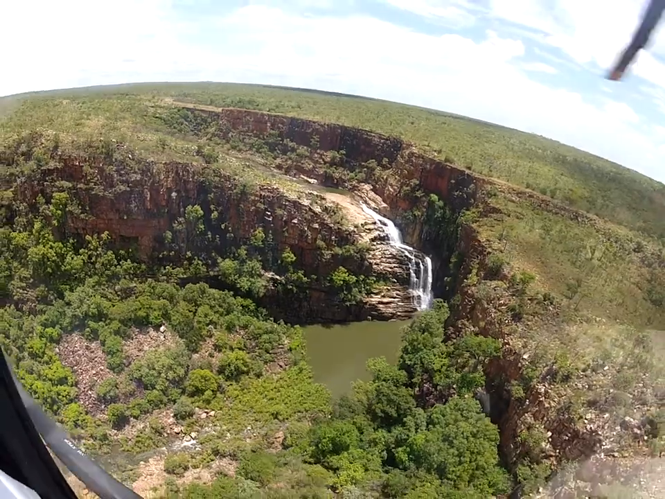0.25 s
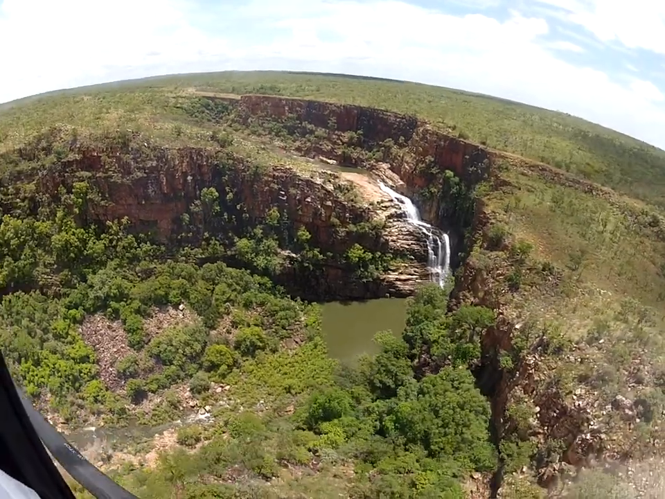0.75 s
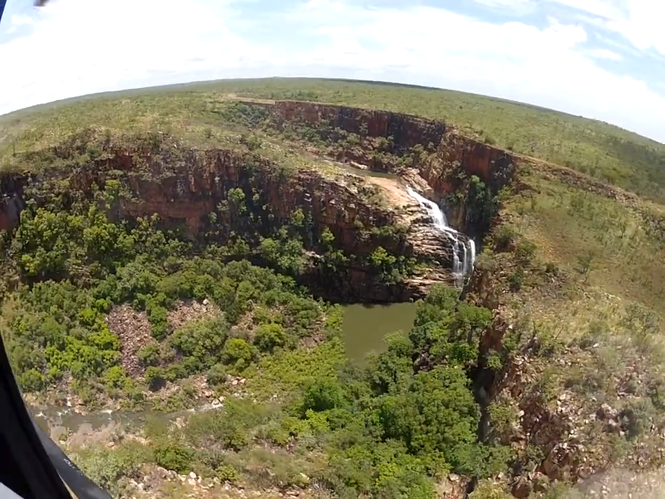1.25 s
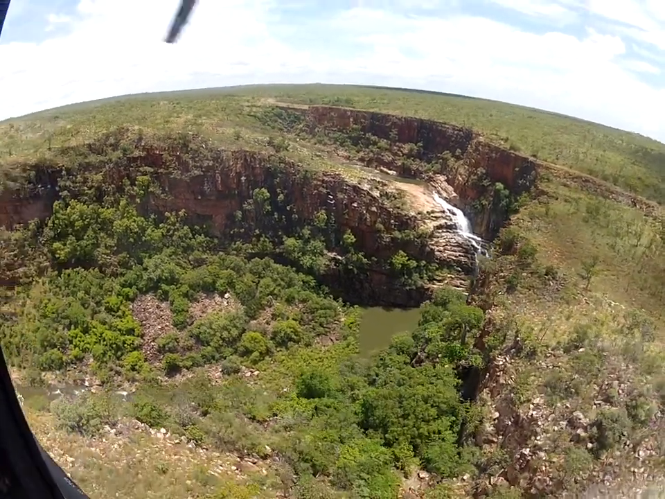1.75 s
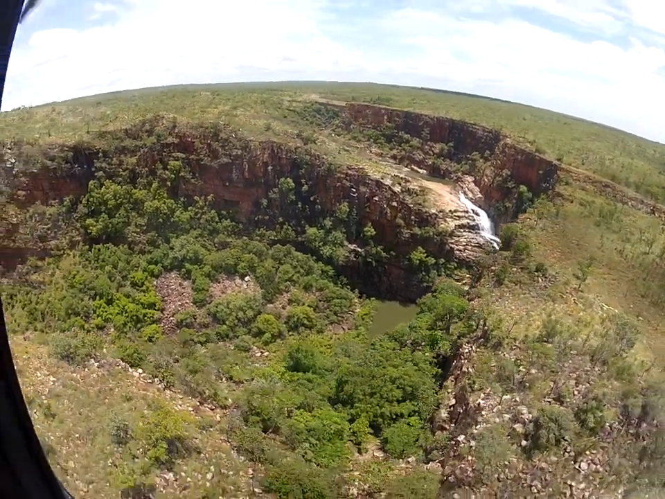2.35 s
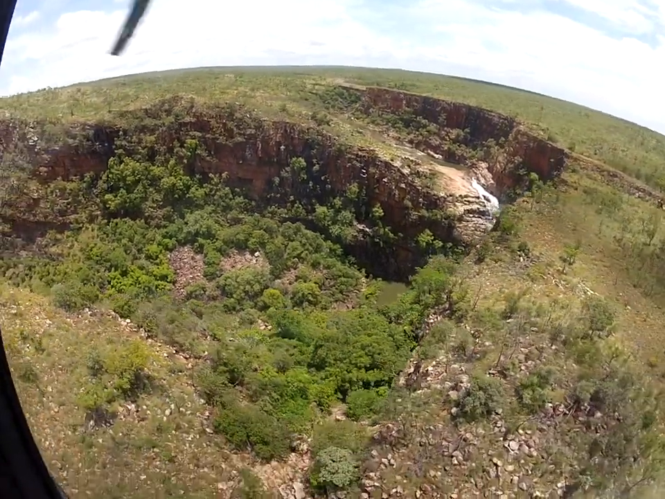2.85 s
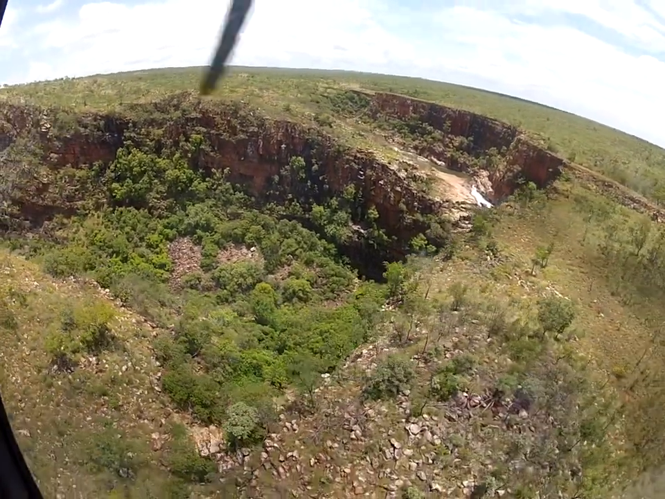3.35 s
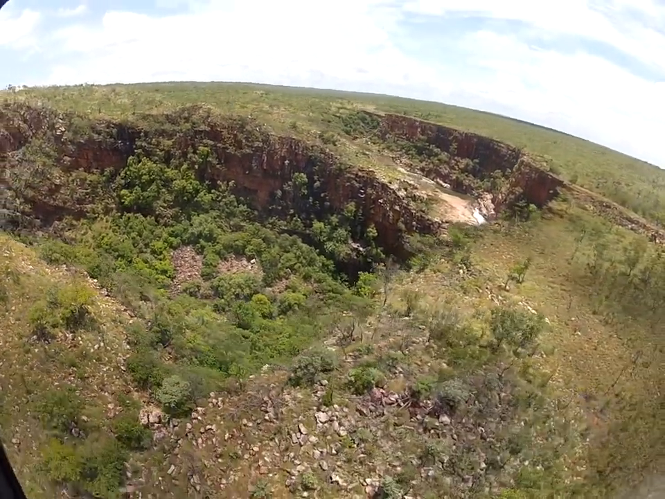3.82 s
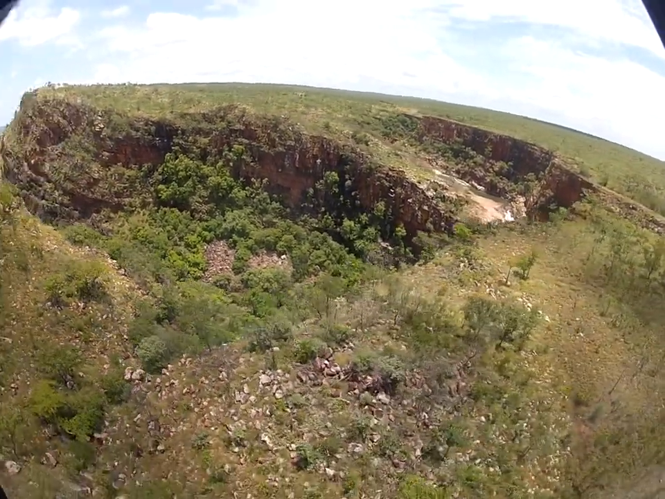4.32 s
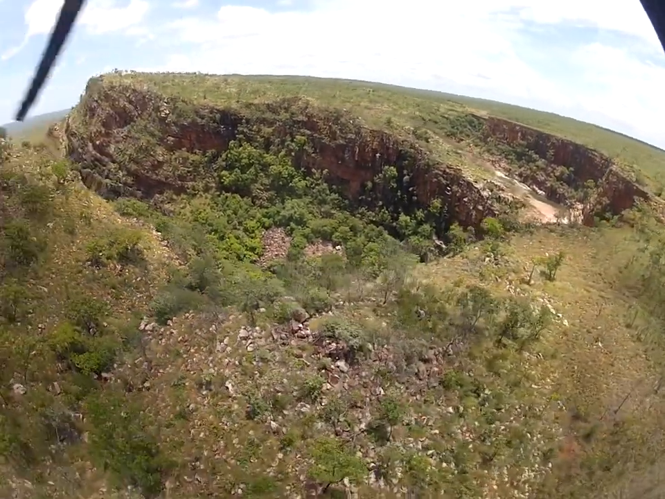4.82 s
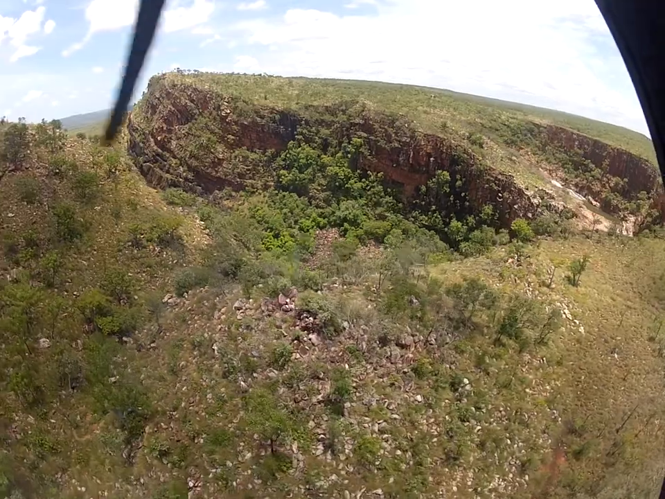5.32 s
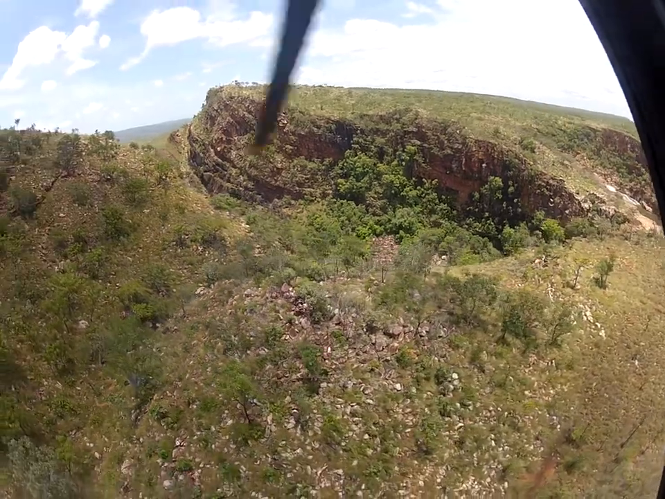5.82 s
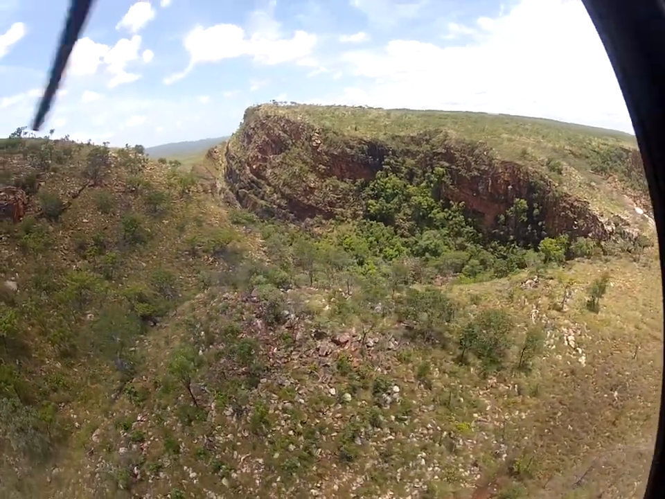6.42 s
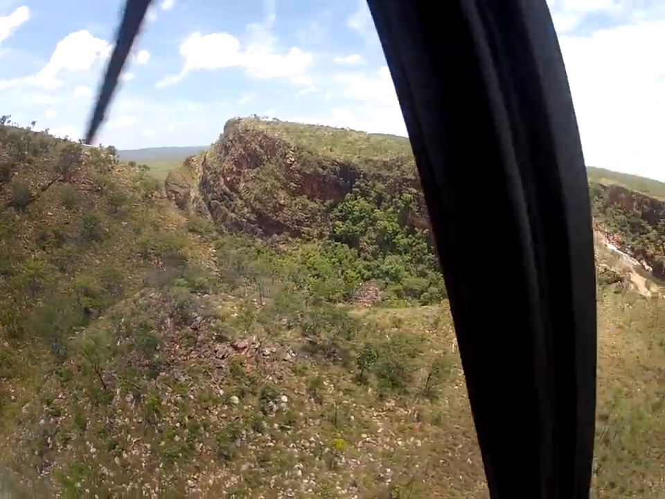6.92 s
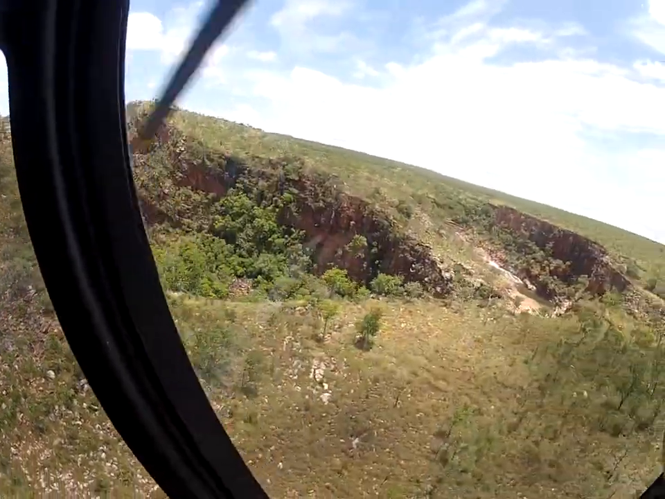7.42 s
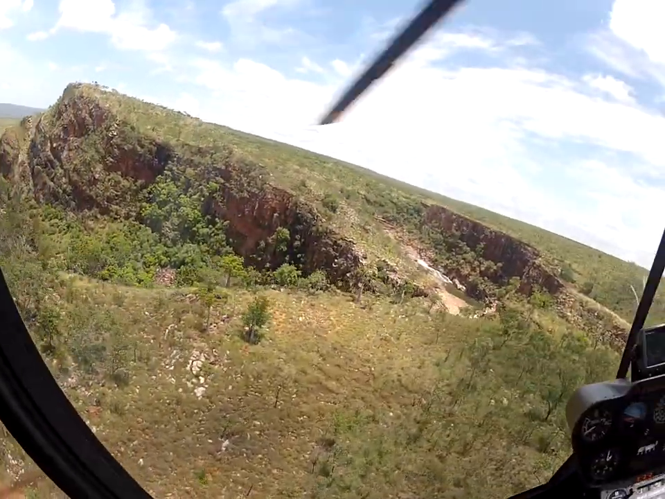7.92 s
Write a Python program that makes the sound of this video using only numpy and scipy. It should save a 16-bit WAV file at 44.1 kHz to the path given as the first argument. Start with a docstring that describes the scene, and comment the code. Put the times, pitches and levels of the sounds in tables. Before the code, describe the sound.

Inside a small helicopter cabin, a loud steady piston engine drone throbs with rotor beats, bursts of blade slap, and one sharp knock near the end.

```python
"""Cabin of a light piston helicopter in a banking turn, close to 8.2 s.
From the start: six-cylinder firing tone and harmonics, repeated rattle pattern, geared whines, blade pulses at a tenth
of the firing rate, shaped-noise wash and rush. Slaps (noise bursts, cracks, pushes) come in spells from 0.25 s to 3.5 s;
a gust swells the draught at 3.7 s, a panel sings most near 5.3 s, slaps return from 5.7 s to 6.9 s. Light rubs hiss
from 6 s; one knock rings the microphone housing at 7.7 s. Coarse sampling mirrors the sound into the treble."""
import sys
import numpy as np
from scipy import signal
from scipy.fft import rfft, irfft, next_fast_len
from scipy.io import wavfile
from scipy.ndimage import uniform_filter1d, map_coordinates

SR = 44100
rng = np.random.default_rng(int(sys.argv[2]) if len(sys.argv) > 2 else 0)


def master(y):
    """Save y as 16-bit WAV."""
    cut = np.clip(np.atleast_2d(y).T, -1, 1)
    pcm = np.round(cut * 32767)  # scale
    wavfile.write(sys.argv[1], SR, pcm.astype(np.int16))


N = 360297
FIRINGS_PER_BLADE, FIRINGS_PER_CYCLE = 10, 6

# rotor load through the turn: [t/s, blade pulse level/dB before trim, wash level/dB before stirring]
ROTOR_LOAD = [(0, -48, -33), (2, -41.5, -32.5), (2.7, -46.5, -33), (5.0, -45.5, -35), (6.1, -37, -32.5),
              (7.0, -38.5, -34.5), (7.6, -38.5, -39)]


def amp(db):
    """Decibels to gain."""
    return 10 ** (np.asarray(db) / 20)


def unit(x):
    """Scale to rms 1."""
    return x / np.sqrt(np.mean(x ** 2) + 1e-20)


def gain(points, hz):
    """Gain of (f/Hz, level/dB) points joined on a log-frequency axis."""
    f, db = np.transpose(points)
    return amp(np.interp(np.log(hz + 1), np.log(f + 1), db))


def curves(rows):
    """One value per sample for each column after the time."""
    s, *columns = np.transpose(rows)
    return [np.interp(np.arange(N) / SR, s, column) for column in columns]


def wobble(rate_hz):
    """Smooth random curve with rate_hz knots a second."""
    knots = rng.standard_normal(int(N * rate_hz / SR) + 4)
    return map_coordinates(knots, [np.arange(N) * rate_hz / SR])


def random_phase():
    """Random start phase in radians."""
    return rng.uniform(0, 2 * np.pi)


def filtered(x, response):
    """Multiply the spectrum of x by a zero-phase response of frequency."""
    size = next_fast_len(N + SR // 2)
    return irfft(rfft(x, size) * response(np.fft.rfftfreq(size, 1 / SR)), size)[..., :N]


def ring(x, points):
    """Causal minimum-phase filter with the given spectrum, from its folded cepstrum."""
    size = 2 ** 15
    cepstrum = irfft(np.log(gain(points, np.fft.rfftfreq(size, 1 / SR))))
    cepstrum[1:size // 2] *= 2
    cepstrum[size // 2 + 1:] = 0
    response = irfft(np.exp(rfft(cepstrum)))
    return signal.fftconvolve(x, response / np.linalg.norm(response))[:N]


def noise(points):
    """Coloured noise of rms 1."""
    return unit(filtered(rng.standard_normal(N), lambda hz: gain(points, hz)))


def add(track, s, sound):
    """Mix a sound into the track at time s."""
    part = track[round(s * SR):][:len(sound)]
    part += sound[:len(part)]


def swell(turns, at, sharp):
    """Bump peaking at 1 once a turn, at the given phase."""
    return np.exp(sharp * (np.cos(2 * np.pi * (turns - at)) - 1))


def passes(blades, at):
    """One impulse per blade, at the given phase of its pass."""
    return np.diff(np.floor(blades - at), prepend=np.floor(blades[0] - at))


def engine(firings, blades):
    """Firing tone throbbing with the rotor, its overtones, and weaker lines from unequal cylinders."""
    # base level of the firing tone in the cabin: [t/s, level/dB]
    boom = [(0.07, -20.5), (0.16, -20.5), (0.74, -18), (1.4, -23), (1.44, -29), (1.56, -21), (3.79, -17.5),
            (4.04, -16), (5.26, -17.5), (5.64, -20.5), (5.71, -29.5), (5.98, -20.5), (6.0, -23.5),
            (6.75, -19), (7.4, -19), (7.6, -25.5), (8.17, -30.5)]
    # base level of its second harmonic: [t/s, level/dB]
    second = [(0.1, -43), (0.14, -40), (1.37, -38), (1.54, -53), (1.58, -37), (1.81, -35), (3.32, -38),
              (4.32, -49), (4.55, -38.5), (5.45, -44), (6.57, -40), (7.6, -52)]
    # panel singing with the eighth firing harmonic, base level: [t/s, level/dB]
    sing = [(3, -58), (4.3, -54.5), (5.3, -51.5), (5.8, -60)]
    # engine lines, base level: [multiple of the four-stroke cycle rate, level/dB]
    lines = [(5, -45), (7, -42), (8, -52), (9, -42), (13, -51), (14, -50.5), (15, -52.5), (20, -54),
             (36, -61.5), (42, -64.5), (54, -61), (56, -73)]
    second_trim_db, third_re_boom_db, third_waver_db = 0.1, -26.5, 0.5

    boom_db, = curves(boom)
    second_db, = curves(second)
    sing_db, = curves(sing)
    angle = 2 * np.pi * (firings + 0.0056 * wobble(17))
    throb_db = -1.5 * swell(blades, at=0.65, sharp=0.76)
    level = amp(boom_db + throb_db + 0.77 + 0.23 * wobble(16))
    out = level * np.sin(angle)

    overtones_db = {
        2: second_db + second_trim_db,
        3: boom_db + third_re_boom_db + third_waver_db * wobble(5),
        8: sing_db + 2 * wobble(7),
    }
    for order, db in overtones_db.items():
        drift = random_phase() + 0.16 * wobble(13)
        out += amp(db + 1.3 * wobble(8)) * np.sin(order * angle + drift)

    for order, db in lines:
        drift = random_phase() + 0.31 * wobble(6)
        line_angle = round(order) * angle / FIRINGS_PER_CYCLE
        out += amp(db + 1.65 * wobble(3.04)) * np.sin(line_angle + drift)
    return np.sqrt(2) * out


def rattle(firings):
    """Valves and exhaust repeat one rough pattern in every four-stroke cycle."""
    # relative spectrum: [f/Hz, level/dB per Hz]
    spectrum = [(100, -28), (190, 1.5), (330, -3), (480, -9), (700, -16.5), (1200, -23.5), (1550, -26),
                (2100, -19.5), (2700, -35), (3100, -28), (4000, -41.5)]
    cycles = firings / FIRINGS_PER_CYCLE
    pattern = rng.standard_normal(round(N / cycles[-1]))
    repeated = np.interp(cycles % 1, np.linspace(0, 1, len(pattern)), pattern)
    level = amp(-45.0 + 0.61 * wobble(2.62))
    return level * unit(filtered(repeated, lambda hz: gain(spectrum, hz)))


def drive(firings):
    """Fan and gear whines whose pitch follows the shaft speed."""
    # whines at mean shaft speed: [f/Hz, base rms level/dB]
    whines = [(389.6, -47.5), (460, -57.5), (586, -59), (779, -71), (2203, -60.5), (3110, -69.5)]
    shaft_s = firings / firings[-1] * N / SR  # time warped by shaft speed
    out = np.zeros(N)
    for hz, db in whines:
        level = amp(db + 2.2 * wobble(2.73))
        out += level * np.sin(2 * np.pi * hz * shaft_s + 0.39 * wobble(7))
    return np.sqrt(2) * out


def rotor(blades):
    """Each blade pushes a pressure pulse into the cabin; its downwash hits the roof about half a pass later."""
    # relative spectrum of a blade pulse: [f/Hz, level/dB per Hz]
    thump = [(13, -18), (28, -14), (41, -4), (55, -2.5), (68, -1.5), (96, -8.5), (123, -1), (165, -4),
             (230, -7), (400, -26), (1000, -71.5)]
    load_db, _ = curves(ROTOR_LOAD)
    blade_pulses = passes(blades, at=0.417) * amp(1.1 * wobble(9.9))
    roof_pulses = passes(blades, at=0.84) * amp(2.5 + 2.5 * wobble(5))
    return amp(load_db + 3.5) * unit(ring(blade_pulses + roof_pulses, thump))


def airflow(firings, blades, strength):
    """Wash and rush surge per blade and grow around wakes; rush flutters with exhaust; the door draught hisses."""
    # rotor wash on the cabin shell, relative spectrum: [f/Hz, level/dB per Hz]
    wash_spectrum = [(15, -23), (45, -8.5), (90, -7), (130, -1.5), (180, 1.5), (235, -5), (300, -5),
                     (410, -11.5), (580, -16), (670, -24.5), (1200, -60), (4000, -88)]
    # air and drive noise through cabin resonances, relative spectrum: [f/Hz, level/dB per Hz]
    rush_spectrum = [(300, -16), (750, -10), (900, -4), (1040, -11.5), (1190, 1.5), (1530, -14.5),
                     (1750, -4.5), (2000, -5.5), (2220, -6), (2600, -18), (3100, -15.5), (3350, -21),
                     (4800, -24.5), (6000, -28)]
    # draught at the door frame, relative spectrum: [f/Hz, level/dB per Hz]
    hiss_spectrum = [(1500, -40), (2800, -16), (3600, 3.5), (4200, -0.5), (4900, 1.5), (6000, -6.5)]
    rush_db, draught_db = -43.0, -59.0
    stir_s, stir_full_db = 0.68, -32.5  # averaging window; mean wake strength of near-full stirring
    stir_wash_db, stir_rush_db = 4, 1.5
    gust_s, gust_width_s, gust_db = 3.7, 0.49, 4.5

    _, wash_db = curves(ROTOR_LOAD)
    mean_strength = uniform_filter1d(strength, size=round(stir_s * SR))
    stir = np.tanh(mean_strength / amp(stir_full_db))
    gust = np.exp(-((np.arange(N) / SR - gust_s) / gust_width_s) ** 2)
    surge = swell(blades, at=1.0, sharp=0.75)
    flutter = swell(firings, at=0.25, sharp=1.6)

    wash = unit(noise(wash_spectrum) * amp(4.7 * surge + 0.6 * wobble(16)))
    rush = unit(noise(rush_spectrum) * amp(1.8 * surge + 1.3 * flutter + 0.56 * wobble(25)))
    out = amp(wash_db + stir_wash_db * stir) * wash
    out += amp(rush_db + stir_rush_db * stir) * rush
    out += amp(draught_db + gust_db * gust) * noise(hiss_spectrum)
    return out


def wake():
    """Wake strength at the rotor: an arch in dB over each encounter, zero elsewhere."""
    # encounters of the rotor with its own wake: [start t/s, length/s, mid strength/dB]
    encounters = [(0.248, 0.59, -37.5), (0.9, 0.07, -39), (1.378, 0.36, -36.5), (1.983, 0.2, -39.5),
                  (2.37, 0.52, -38), (2.796, 0.26, -35.5), (3.464, 0.07, -36.5), (5.72, 0.08, -33),
                  (5.826, 0.256, -34.5), (6.068, 0.314, -28), (6.568, 0.32, -32.5)]
    edge_drop_db = 7
    t, strength = np.arange(N) / SR, np.zeros(N)
    for start_s, length_s, db in encounters:
        off_centre = 2 * (t - start_s) / length_s - 1
        inside = np.abs(off_centre) < 1
        strength[inside] = amp(db - edge_drop_db * off_centre[inside] ** 2)
    return strength


def slaps(blades, strength):
    """A blade cuts the wake: crack, turbulent burst, weaker second burst, and a push steeper than the strength."""
    # turbulent bursts, relative spectrum: [f/Hz, level/dB per Hz]
    burst_spectrum = [(60, -31), (130, -0.5), (200, 0), (330, -5), (570, -2), (700, -12.5), (900, -9),
                      (1200, -13), (1500, -23.5), (1830, -14), (2300, -22), (3000, -35.5), (6000, -41)]
    # sharp edge of a slap, relative spectrum: [f/Hz, level/dB per Hz]
    crack_spectrum = [(500, -19), (900, -4), (1250, -2), (1520, -6), (1850, 1), (2300, -4), (2900, -15),
                      (4500, -19.5), (6000, -32)]
    slap_phase, scatter_db = 0.83, 1.1  # phase in blade passes
    crack_db, crack_t60_s = -36.5, 0.044  # same in weak and strong slaps
    burst_t60_s, push_t60_s, push_hz = 0.045, 0.058, 195
    rise_s, second_burst_s = 0.0023, 0.0122

    t = np.arange(SR // 10) / SR
    rise = 1 - np.exp(-t / rise_s)
    burst = rise * amp(-60 * t / burst_t60_s)
    crack = rise * amp(crack_db - 60 * t / crack_t60_s)
    push = np.sin(2 * np.pi * push_hz * t) * rise * amp(-60 * t / push_t60_s)
    air, cracks, pushes = np.zeros((3, N))
    for i in np.flatnonzero(passes(blades, slap_phase) * strength):
        s = i / SR
        db = 20 * np.log10(strength[i]) + scatter_db * rng.standard_normal()
        add(air, s, amp(db + 4.5) * burst)
        add(air, s + second_burst_s, amp(db - 5.0) * burst)
        add(cracks, s, crack)
        add(pushes, s, -amp(1.33 * db + 29.5) * push)
    # sign gives eddies of even strength
    turbulence = np.sign(noise([(100, -1.5), (2500, 0.5), (4000, -28.5)]))
    return ring(air * turbulence, burst_spectrum) + cracks * noise(crack_spectrum) + pushes


def handling():
    """Light rubs hiss on the microphone housing; one hard knock shoves the microphone and rings the housing."""
    # light rubs, level before the soft onset: [t/s, level/dB, t60/s]
    scuffs = [(6.013, -34.5, 0.083), (6.224, -35.5, .03), (7.849, -32.5, 0.076), (7.954, -43, 0.059)]
    # relative spectrum of a rub: [f/Hz, level/dB per Hz]
    scuff_spectrum = [(1000, -24), (3000, 3.5), (4500, -8), (6000, -4.5)]
    # housing modes, level before trim: [f/Hz, level/dB, t60/s]
    modes = [(962, 1.5, 0.0089), (1220, 0, 0.012), (1760, 4, 0.01), (4620, -3.5, 0.0027)]
    knock_s, case_trim_db = 7.7146, -0.8
    push_db, push_s, push_t60_s = 5.5, 0.002, 0.012  # push_s: time until it swings back

    t = np.arange(SR // 8) / SR
    knock, rubs = np.zeros(N), np.zeros(N)
    for s, db, t60_s in scuffs:
        add(rubs, s, amp(db - 60 * t / t60_s) * (1 - np.exp(-t / 0.00069)))

    shove = -amp(push_db) * (1 - t / push_s) * amp(-60 * t / push_t60_s)
    case = -sum(amp(db - 60 * t / t60_s) * np.sin(2 * np.pi * hz * t) for hz, db, t60_s in modes)
    shove *= 1 - np.exp(-t / 0.00042)
    case *= amp(case_trim_db) * (1 - np.exp(-t / 0.00036))
    add(knock, knock_s, shove + case)
    return knock + rubs * noise(scuff_spectrum)


def scene():
    """Engine and rotor geared together, heard by one microphone."""
    # nearly steady engine speed: [t/s, firing rate f/Hz]
    firing_rate = [(0.0, 137.02), (0.8, 136.06), (1.7, 136.75), (3.0, 136.73), (4.5, 136.88), (5.5, 137.26),
                   (6.2, 137.63), (6.7, 137.19), (7.2, 135.74), (7.8, 136.58), (8.17, 137.44)]
    firings = np.cumsum(curves(firing_rate)[0]) / SR
    blades = firings / FIRINGS_PER_BLADE
    strength = wake()
    machine = engine(firings, blades) + rattle(firings) + drive(firings) + rotor(blades)
    cabin = machine + airflow(firings, blades, strength) + slaps(blades, strength) + handling()
    return np.array([cabin, cabin])


def record(dry):
    """Clip, band-limit and add the image of a sample-and-hold, which mirrors the band around the hold rate."""
    hold_hz, top_hz = 12000, 15300
    band = [(4800, 0), (5500, -4.5), (6000, -9), (6600, -38), (7500, -78)]  # [f/Hz, level/dB]
    low = filtered(np.clip(dry, -1, 1), lambda hz: gain(band, hz))
    # steps of a held signal grow with its slope
    slope = np.gradient(low, axis=-1) * SR / (2 * np.pi)
    steps = 2 * slope * np.sin(2 * np.pi * hold_hz * np.arange(N) / SR)
    mirror = amp(0.7) * filtered(steps, lambda hz: 1 / np.maximum(hz, hold_hz / 2))
    return filtered(np.clip(low + mirror, -1, 1), lambda hz: hz < top_hz)


dry = scene()
out = record(dry)
master(out)
```